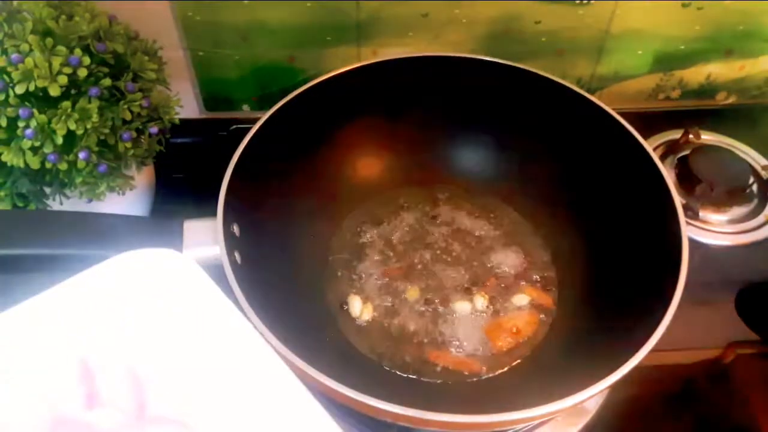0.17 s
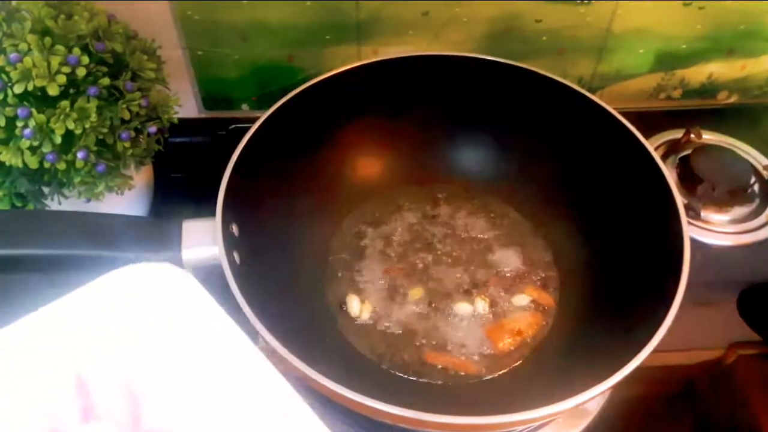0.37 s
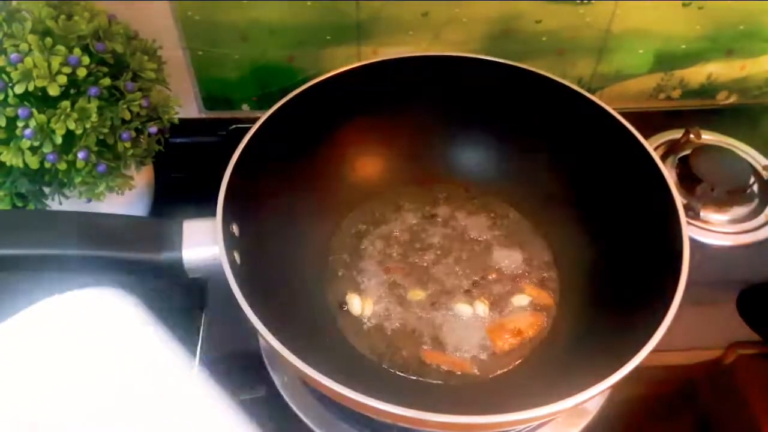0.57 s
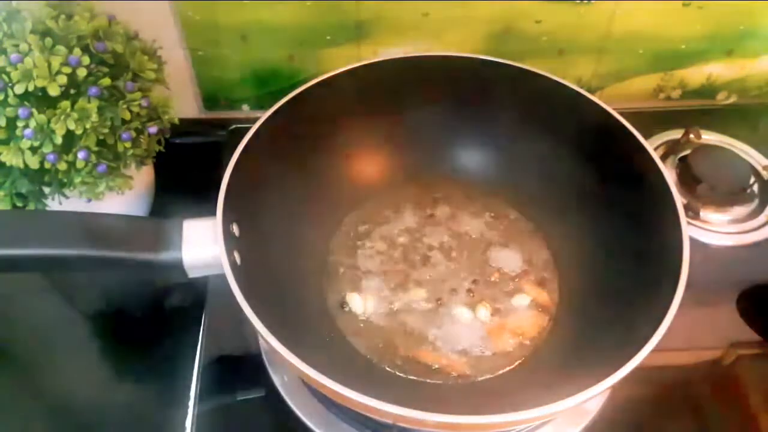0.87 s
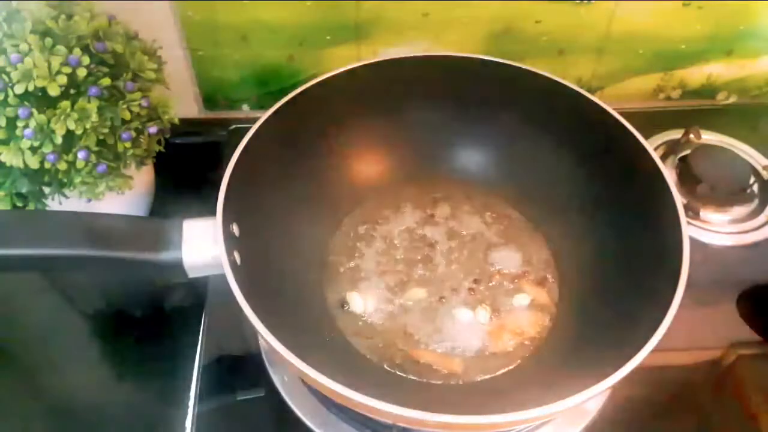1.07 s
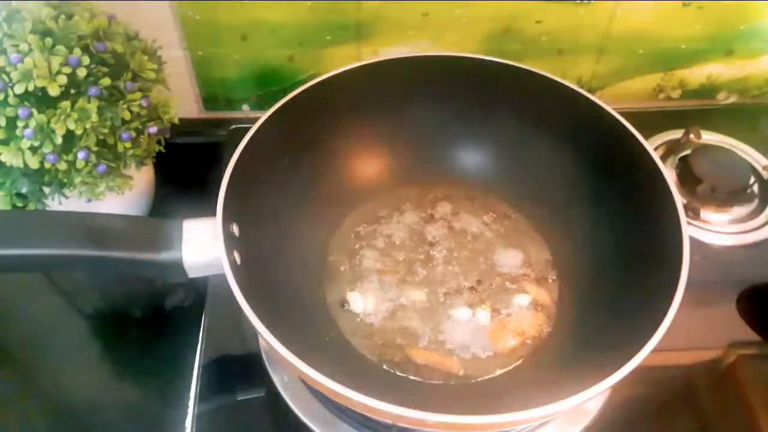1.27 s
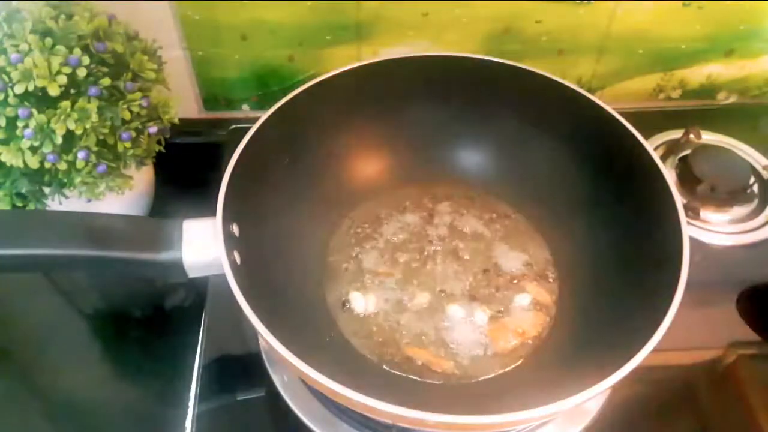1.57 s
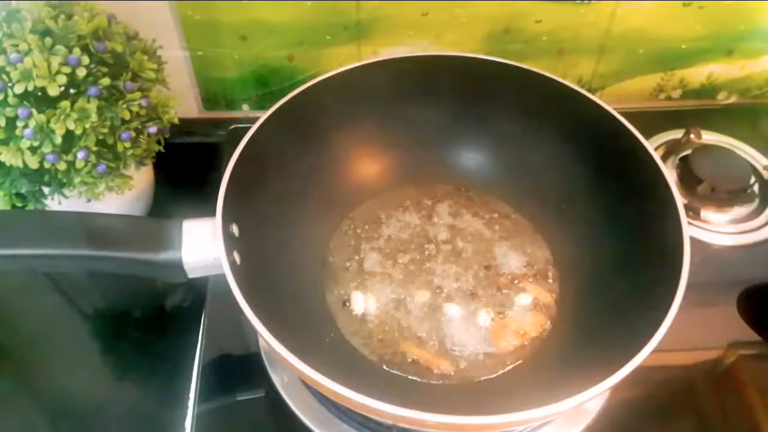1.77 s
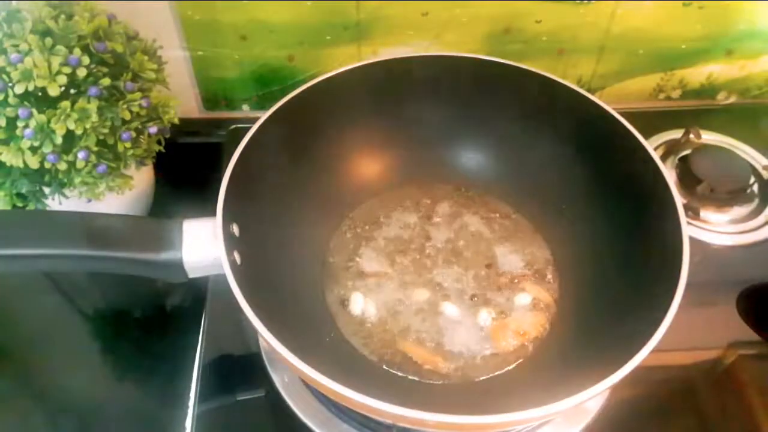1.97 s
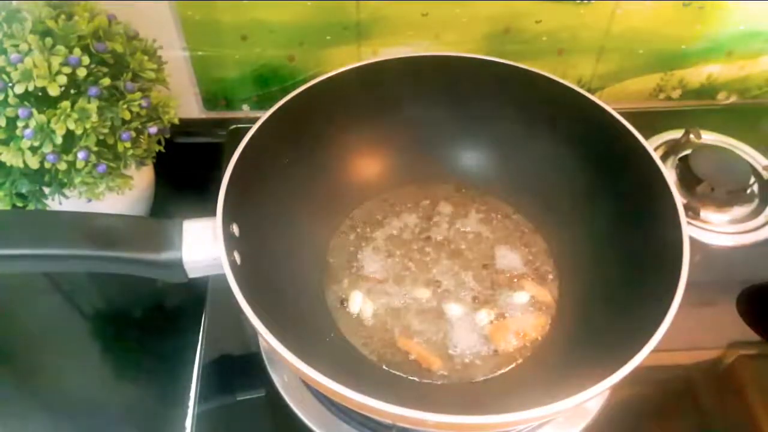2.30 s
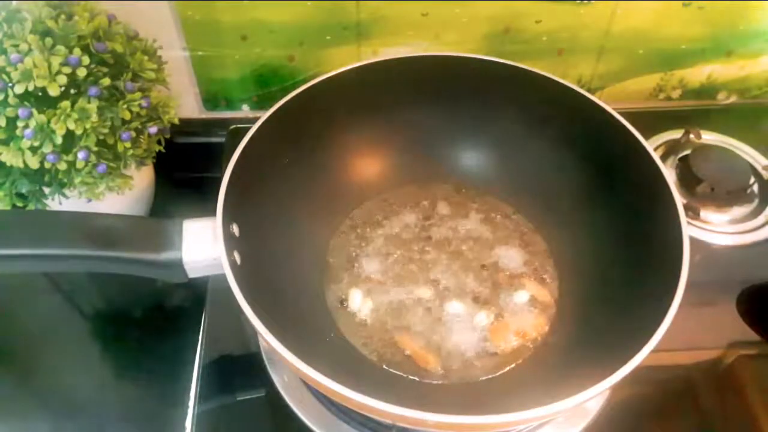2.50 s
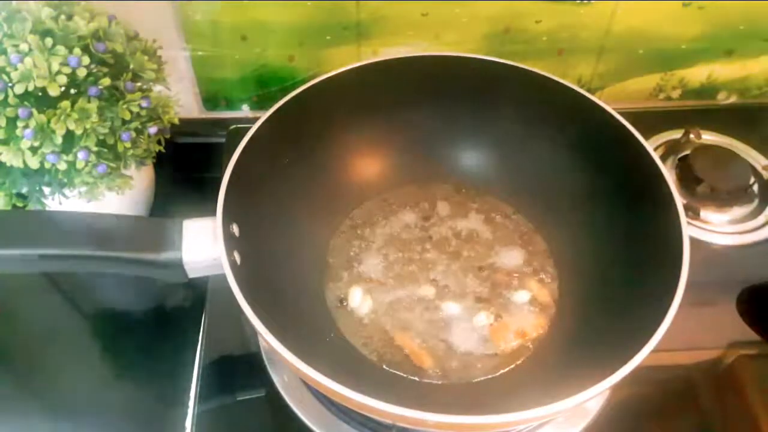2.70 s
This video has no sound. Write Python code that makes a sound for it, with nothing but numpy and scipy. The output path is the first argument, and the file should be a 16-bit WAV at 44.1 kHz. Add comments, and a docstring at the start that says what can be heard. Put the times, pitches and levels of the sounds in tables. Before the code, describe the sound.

Close mono phone pickup in a small kitchen: quick, irregular, slightly ringing pops and tiny spits of oil in a pan throughout, a quiet gas flame beneath, two loud board clacks around two seconds, then soft hollow bumps.

```python
"""Small kitchen, phone microphone close to a wok: seeds and whole spices pop in hot oil.
Each pop is a noisy crack and spray over damped modes of the pan; small spits are brighter pops.
A gas flame murmurs and the oil fizzes faintly, both as coloured noise.
A board clacks onto the counter, slapping and ringing; something hollow is knocked and shudders dully.
All of it arrives in mono; the blows have short room tails."""
import sys
import numpy as np
from scipy import signal
from scipy.fft import rfft, irfft, next_fast_len
from scipy.io import wavfile
from scipy.ndimage import uniform_filter1d, map_coordinates

SR = 44100
rng = np.random.default_rng(int(sys.argv[2]) if len(sys.argv) > 2 else 0)


def how_loud(loudness_db):
    """Turn decibels into a plain amplitude multiplier (0 dB gives 1, 20 dB gives 10)."""
    steps = np.asarray(loudness_db, float) / 20
    return 10 ** steps


def generate_wav(sig):
    """Save sig (samples, or channels by samples) to the path in sys.argv[1] as 16-bit PCM at SR."""
    pcm = np.round(np.clip(np.atleast_2d(sig).T, -1, 1) * 32767).astype(np.int16)
    wavfile.write(sys.argv[1], SR, pcm)


N = 125685  # samples

# Gas flame spectrum: pitch_hz, relative density_db (per Hz)
FLAME_SPECTRUM = [(28, -36), (70, -4), (135, 6), (200, -4.5), (355, -2.5), (410, -9), (640, -17),
                  (677, -0.5), (715, -6.5), (1500, -40.5)]
# Oil fizz spectrum: pitch_hz, relative density_db (per Hz)
FIZZ_SPECTRUM = [(600, -17), (1500, 5.5), (3000, -2.5), (6200, -63), (16000, -23)]
FLAME_DB, FIZZ_DB, FIZZ_SWELL_DB = -48.5, -62, -2
GRAIN_DB = 3.5  # raggedness of fizz, froth, spray and rattle

# Small bright spits of oil: start_s, level_db (before POP_DB)
SPIT_EVENTS = [(0.007, -39.5), (0.217, -33.5), (0.2786, -29.5), (0.4834, -32), (0.593, -24),
               (0.6973, -24.5), (0.9144, -28.5), (0.9826, -29), (1.0057, -29), (1.064, -40.5),
               (1.2455, -35.5), (1.3758, -26), (1.562, -31), (1.5769, -27.5), (1.6904, -28), (1.7905, -25),
               (1.8433, -24), (1.863, -32.5), (2.107, -24), (2.2534, -25.5), (2.452, -29.5)]
SPIT_HZ, SPIT_CRACK_DB = 2000, -13
# Pops of seeds: start_s, level_db (before POP_DB), favoured pitch_hz, crack_over_ring_db (before CRACK_DB)
POP_EVENTS = [(0.0948, -24, 1440, -26), (0.1045, -23.5, 1370, -14.5), (0.123, -23.5, 1570, -14.5),
              (0.1502, -23, 1330, -20.5), (0.1747, -15.5, 1440, -20.5), (0.259, -22, 1420, -18),
              (0.2929, -14.5, 1450, -23.5), (0.3301, -27, 1400, -42), (0.415, -17, 1210, -34),
              (0.5032, -21.5, 1310, -20), (0.628, -26, 1450, -23), (0.7478, -20, 2000, -19.5),
              (0.7608, -20.5, 1790, -23), (0.7849, -13.5, 1670, -26.5), (0.898, -20, 1460, -26),
              (0.9369, -19.5, 2220, -32), (1.1145, -16, 1090, -23.5), (1.1481, -17.5, 1710, -24.5),
              (1.293, -22.5, 1750, -18), (1.3389, -28.5, 1510, -19), (1.3597, -25.5, 1450, -19),
              (1.4505, -13.5, 1434, -24.5), (1.5, -18.5, 1500, -51), (1.527, -23, 1550, -18),
              (1.5521, -29, 1520, -38.5), (1.725, -20, 2200, -28), (1.769, -18, 1270, -16.5),
              (1.9108, -19, 1570, -28), (2.0745, -17, 1410, -31), (2.0845, -14.5, 1520, -15),
              (2.223, -9.5, 1530, -36.5), (2.4302, -14, 1370, -24.5), (2.476, -17, 1390, -19),
              (2.6214, -24, 2380, -34.5), (2.6377, -23, 1390, -12), (2.6767, -16.5, 1350, -57),
              (2.707, -25, 1400, -10), (2.723, -13, 1390, -22.5), (2.806, -20.5, 2600, -11.5)]
# Modes of the pan's bowl: pitch_hz, level_db
PAN_MODES = [(1100, -7), (1290, -9), (1430, -2), (1730, -6.5), (2080, -9), (2370, -4), (3130, -12.5),
             (4230, -13.5)]
# Spectrum of the bursting crack and spray: pitch_hz, relative density_db (per Hz)
CRACK_SPECTRUM = [(700, -11), (1400, 3), (2500, -8.5), (4200, -12), (6500, -26.5), (16000, -36)]
POP_DB, POP_RISE_S, MODE_SCATTER_DB, DETUNE = -3.5, 0.00081, 2.5, 0.031  # detune as a fraction of pitch
FAVOUR_DB_PER_OCT = 14  # how fast modes weaken away from a blow's own pitch
# The ring drops fast, froth keeps it stirring roughly
PAN_T60_S, LINGER_DB, LINGER_T60_S = 0.03, -12.5, 0.13
POP_BLUR_HZ, FROTH_BLUR_HZ = 45, 220  # bubbling oil roughens the ring
# The burst and the spray after it
CRACK_DB, CRACK_RISE_S, CRACK_T60_S, SPRAY_DB, SPRAY_T60_S = 8.5, 0.0004, 0.0043, -6.5, 0.061

# Contacts of board and counter: start_s, level_db (before CLACK_DB), favoured pitch_hz
CLACK_EVENTS = [(1.927, -5.5, 2600), (1.9383, -7.5, 920), (1.957, -17.5, 1380), (2.1336, -2.5, 1150),
                (2.144, -11.5, 900), (2.17, -14.5, 880), (2.181, -14.5, 950)]
# Modes of the board: pitch_hz, level_db
BOARD_MODES = [(826, -12), (905, 6.5), (1292, -2.5), (1690, 3), (2200, -3), (3000, -5.5), (3620, -1.5)]
# Spectrum of the board's slap: pitch_hz, relative density_db (per Hz)
SLAP_SPECTRUM = [(50, -30), (200, -8.5), (900, -1), (3200, -8), (6400, -24.5), (16000, -48.5)]
CLACK_DB, BOARD_T60_S, BOARD_SCATTER_DB = -4.5, 0.048, 2
# The slap, then the counter's rattle (RATTLE_DB is relative to the slap)
SLAP_DB, SLAP_T60_S, RATTLE_DB, RATTLE_T60_S = -8, 0.043, -16.5, 0.45

# Knocks of something hollow: start_s, level_db (before KNOCK_DB), hold_s (before it dies)
KNOCK_EVENTS = [(2.4043, -21, 0.015), (2.559, -25.5, 0.061), (2.663, -30.5, 0.018)]
# Modes of the hollow thing: pitch_hz, level_db
HOLLOW_MODES = [(140, 1), (335, -7.5), (468, 3), (578, 10.5), (705, -0.5), (985, -3), (1254, -19)]
# Spectrum of a knock's dull contact: pitch_hz, relative density_db (per Hz)
THUD_SPECTRUM = [(200, -47), (600, 3.5), (1700, -7.5), (3500, -49.5)]
KNOCK_DB, KNOCK_T60_S, THUD_DB, THUD_RISE_S = 0.5, 0.16, -12.5, 0.00038

# Decay of the room: pitch_hz, t60_s
KITCHEN_DECAY = [(500, 0.72), (10000, 0.34)]
POP_ROOM_DB, CLACK_ROOM_DB, WALL_S = -15, -17, 0.006  # tail levels; delay before the tail
# Response of the phone's microphone: pitch_hz, gain_db
MICROPHONE_RESPONSE = [(6300, 0), (7900, -15), (10000, -6), (15500, -2.5)]


def unit(x):
    """Scaled to rms 1."""
    return x / np.sqrt(np.mean(x ** 2) + 1e-20)


def along(points, hz):
    """(Hz, value) points read on a log frequency axis."""
    f, v = np.transpose(points)
    return np.interp(np.log(hz + 1), np.log(f + 1), v)


def noise(spectrum, shape):
    """Rows of coloured noise, rms 1 over all rows."""
    m = next_fast_len(shape[1])
    gain = how_loud(along(spectrum, np.fft.rfftfreq(m, 1 / SR)))
    white = rng.standard_normal((shape[0], m))
    return unit(irfft(rfft(white) * gain, m)[:, :shape[1]])


def wobble(rate):
    """A smooth random curve, rate knots a second."""
    knots = rng.standard_normal(int(N * rate / SR) + 4)
    return map_coordinates(knots, [np.arange(N) * rate / SR])


def grain(shape, depth_db):
    """Rows of ragged gain, changing every few milliseconds."""
    ragged = uniform_filter1d(rng.standard_normal(shape), size=100, axis=1)
    return unit(how_loud(depth_db * unit(ragged)))


def ring(modes, t, t60, extra_db, rise_s, scatter_db, detune, blur_hz):
    """One peak-1 row per blow: damped modes, level and tuning redrawn; extra_db is blows x modes."""
    hz, db = np.transpose(modes)[:, None, :, None]
    draw = rng.standard_normal((len(extra_db), len(modes), 2))
    level = how_loud(db + (extra_db + scatter_db * draw[..., 0])[..., None])
    tuned_hz = hz * (1 + detune * draw[..., 1:])
    # a random walk in phase widens each mode by about blur_hz
    steps = rng.standard_normal((len(extra_db), len(modes), len(t)), np.float32)
    walk = uniform_filter1d(np.cumsum(steps, axis=2), size=40, axis=2)
    drift = walk * np.sqrt(2 * np.pi * abs(blur_hz) / SR)
    rows = (level * np.sin(2 * np.pi * tuned_hz * t + drift)).sum(1)
    rows = rows * how_loud(-60 * t / t60) * (1 - np.exp(-t / rise_s))
    return rows / np.abs(rows).max(1, keepdims=True)


def place(times, rows):
    """Rows summed into the timeline."""
    at = np.round(np.asarray(times) * SR).astype(int)[:, None] + np.arange(rows.shape[1])
    return np.bincount(at.ravel(), rows.ravel(), N + SR)[:N]


def kitchen(rows, db):
    """Each row with its own noise tail, every frequency dying at its own speed."""
    hz, t, z = signal.stft(rng.standard_normal((len(rows), SR // 3)), SR, nperseg=256)
    decay = how_loud(-60 * t / along(KITCHEN_DECAY, hz)[:, None])
    tail = signal.istft(z * decay, SR, nperseg=256)[1]
    tail = tail / np.linalg.norm(tail, axis=1, keepdims=True)
    tail = np.pad(tail, ((0, 0), (int(WALL_S * SR), 0)))
    wet = how_loud(db) * signal.fftconvolve(rows, tail, axes=1)
    return wet + np.pad(rows, ((0, 0), (0, wet.shape[1] - rows.shape[1])))


def stove():
    """The flame's low murmur wavers slowly; the oil's fizz is ragged and swells."""
    flutter_db = 1.2 * wobble(8)
    flame = how_loud(FLAME_DB + flutter_db) * noise(FLAME_SPECTRUM, (1, N))[0]
    ragged_fizz = (noise(FIZZ_SPECTRUM, (1, N)) * grain((1, N), GRAIN_DB))[0]
    fizz = how_loud(FIZZ_DB + FIZZ_SWELL_DB * wobble(14)) * ragged_fizz
    return flame + fizz


def spits():
    """Droplets burst like pops of one colour, all sharing a favoured pitch and crack level."""
    s, db = np.transpose(SPIT_EVENTS)
    return pops(s, db, SPIT_HZ + 0 * s, SPIT_CRACK_DB + 0 * s)


def pops(s, db, pitch_hz, crack_db):
    """A burst of steam cracks, sprays oil and rings the pan, most in the modes near its own pitch."""
    t = np.arange(SR // 12) / SR
    octaves = np.abs(np.log2(np.transpose(PAN_MODES)[0] / pitch_hz[:, None]))
    favour_db = -FAVOUR_DB_PER_OCT * octaves
    body = ring(PAN_MODES, t, PAN_T60_S, favour_db, POP_RISE_S, MODE_SCATTER_DB, DETUNE, POP_BLUR_HZ)
    froth = ring(PAN_MODES, t, LINGER_T60_S, favour_db, POP_RISE_S, MODE_SCATTER_DB, DETUNE, FROTH_BLUR_HZ)
    body = body + how_loud(LINGER_DB) * froth * grain(body.shape, GRAIN_DB)
    burst = how_loud(-60 * t / CRACK_T60_S)
    spray = how_loud(SPRAY_DB - 60 * t / SPRAY_T60_S) * grain(body.shape, GRAIN_DB)
    rise = 1 - np.exp(-t / CRACK_RISE_S)
    crack = how_loud(crack_db + CRACK_DB)[:, None] * (burst + spray) * rise * noise(CRACK_SPECTRUM, body.shape)
    return place(s, kitchen(how_loud(db + POP_DB)[:, None] * (body + crack), POP_ROOM_DB))


def clacks():
    """The board meets the counter and rocks: each contact slaps and rings the modes near its own pitch."""
    s, db, pitch_hz = np.transpose(CLACK_EVENTS)
    t = np.arange(SR // 4) / SR
    octaves = np.abs(np.log2(np.transpose(BOARD_MODES)[0] / pitch_hz[:, None]))
    body = ring(BOARD_MODES, t, BOARD_T60_S, -FAVOUR_DB_PER_OCT * octaves, rise_s=0.00059,
                scatter_db=BOARD_SCATTER_DB, detune=0, blur_hz=35)
    contact = how_loud(-60 * t / SLAP_T60_S)
    rattle = how_loud(RATTLE_DB - 60 * t / RATTLE_T60_S) * grain(body.shape, GRAIN_DB)
    slap = how_loud(SLAP_DB) * (contact + rattle) * noise(SLAP_SPECTRUM, body.shape)
    slap = slap * (1 - np.exp(-t / CRACK_RISE_S))
    return place(s, kitchen(how_loud(db + CLACK_DB)[:, None] * (body + slap), CLACK_ROOM_DB))


def knocks():
    """Something hollow is bumped and shudders on: its ring and a dull thud hold unevenly, then die."""
    s, db, hold_s = np.transpose(KNOCK_EVENTS)[..., None]
    t = np.arange(SR // 3) / SR
    # undamped here: the fade below ends ring and thud together
    body = ring(HOLLOW_MODES, t, np.inf, 0 * db, THUD_RISE_S, scatter_db=7, detune=0, blur_hz=22.4)
    thud = how_loud(THUD_DB) * (1 - np.exp(-t / THUD_RISE_S)) * noise(THUD_SPECTRUM, body.shape)
    fade = how_loud(db + KNOCK_DB - 60 * np.maximum(t - hold_s, 0) / KNOCK_T60_S)
    return place(s[:, 0], kitchen(fade * (body + thud), CLACK_ROOM_DB))


def scene():
    """Everything summed at one microphone."""
    return (stove() + spits() + pops(*np.transpose(POP_EVENTS)) + clacks() + knocks())[None]


def roll_off(x):
    """The treble ends steeply here."""
    return signal.sosfilt(signal.butter(12, 16430, fs=SR, output="sos"), x)


def record(dry):
    """The phone's microphone colours the sound with a dip in the treble."""
    m = next_fast_len(N + 4096)
    response = how_loud(along(MICROPHONE_RESPONSE, np.fft.rfftfreq(m, 1 / SR)))
    heard = irfft(rfft(dry, m) * response, m)[:, :N]
    return roll_off(heard)


dry = scene()
out = record(dry)
generate_wav(out)
```